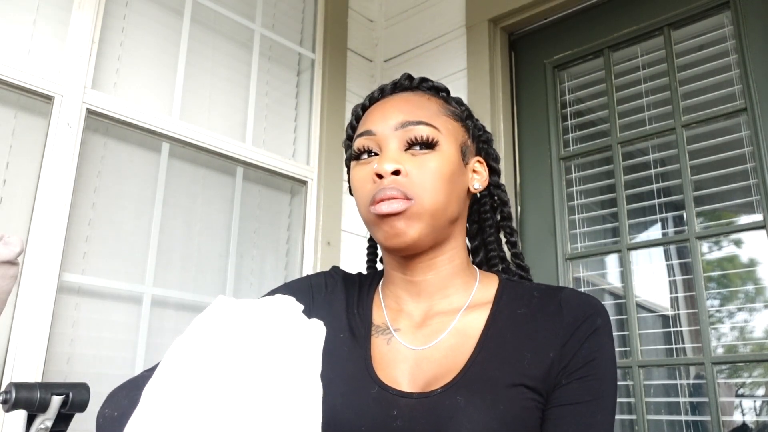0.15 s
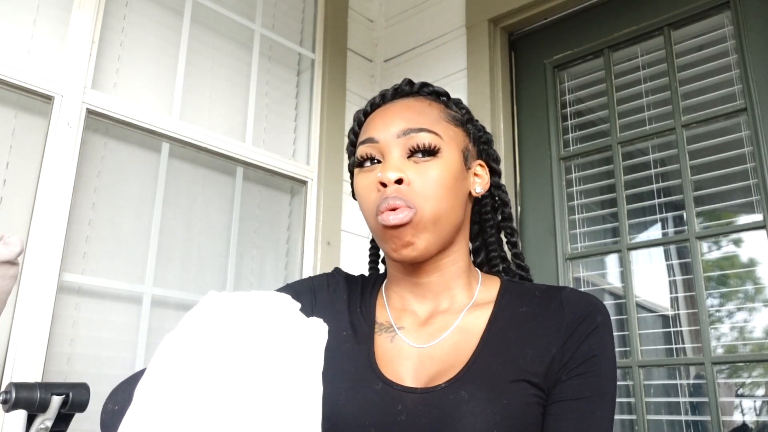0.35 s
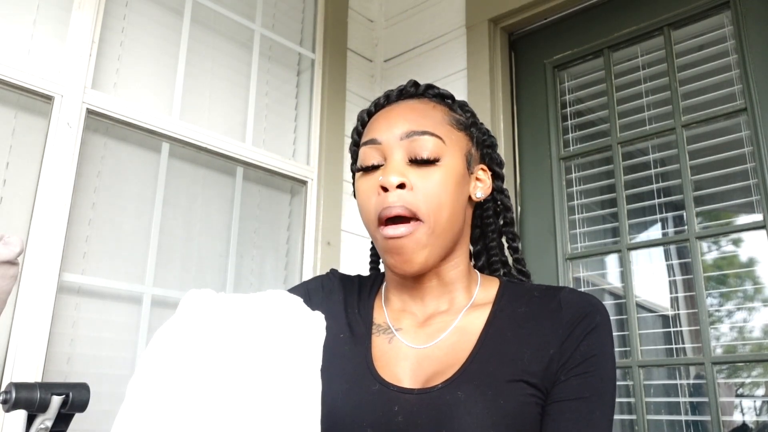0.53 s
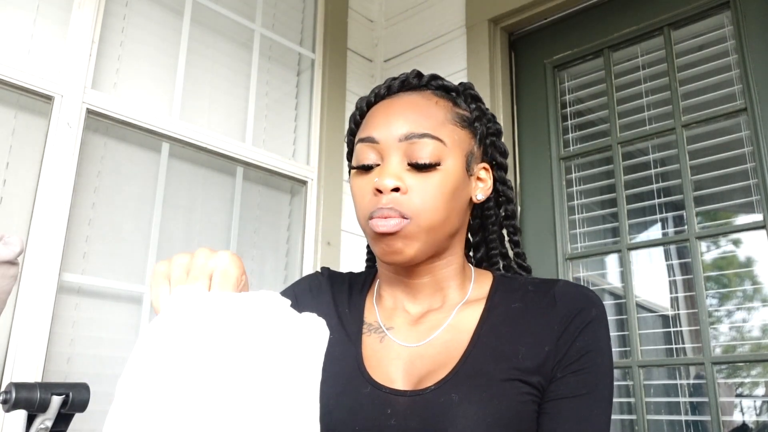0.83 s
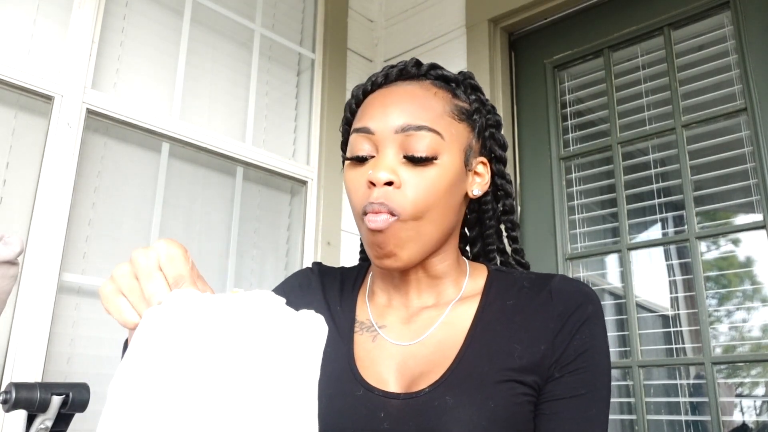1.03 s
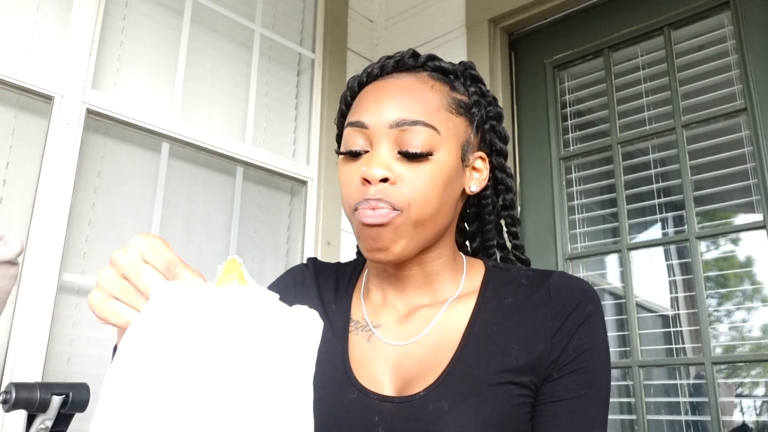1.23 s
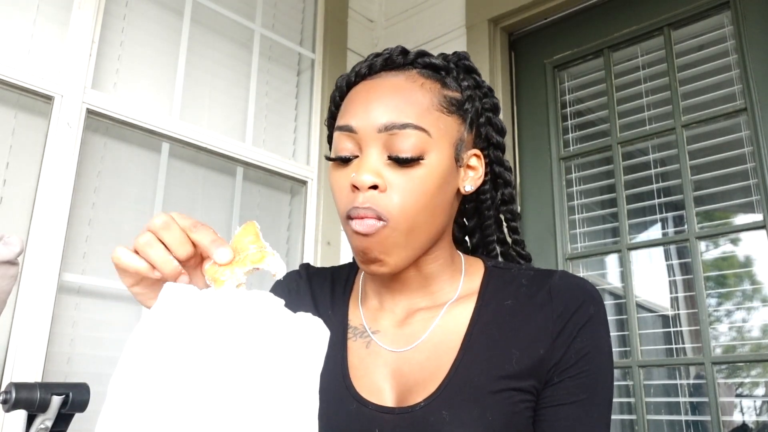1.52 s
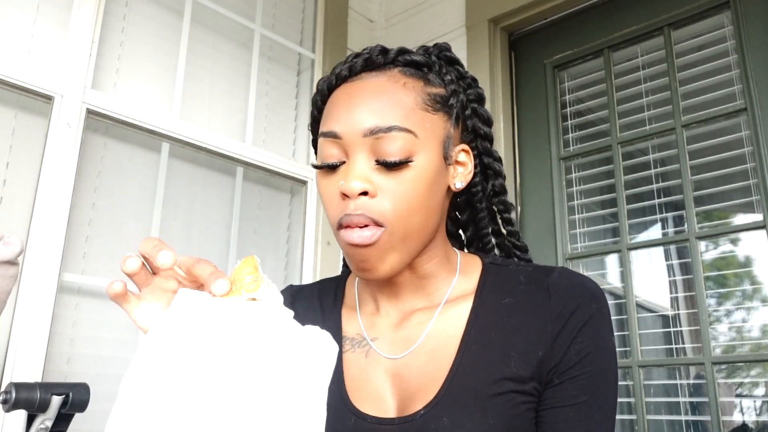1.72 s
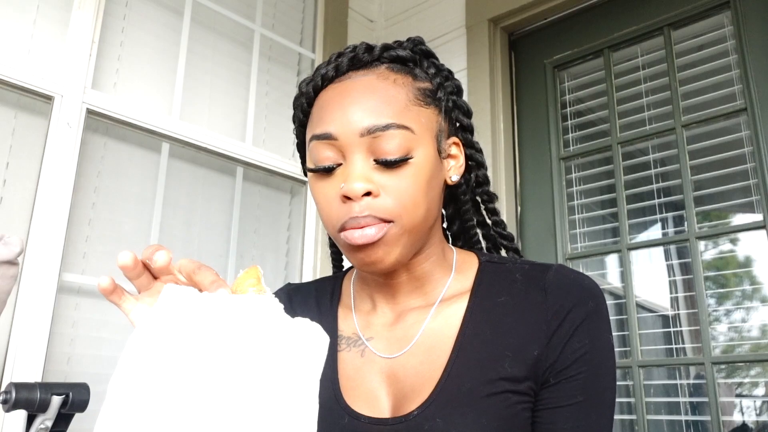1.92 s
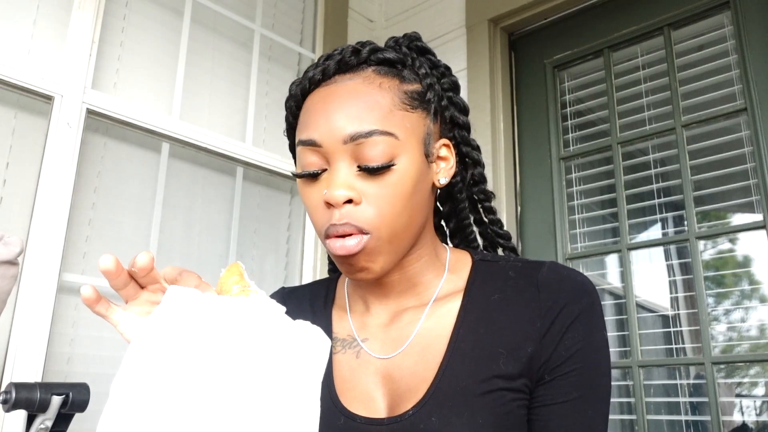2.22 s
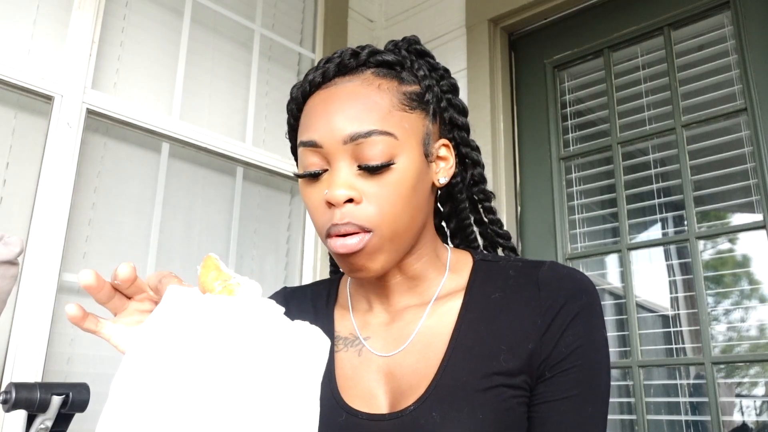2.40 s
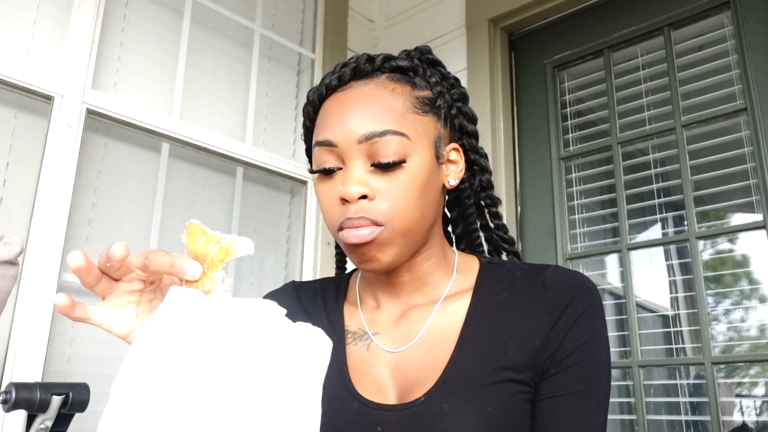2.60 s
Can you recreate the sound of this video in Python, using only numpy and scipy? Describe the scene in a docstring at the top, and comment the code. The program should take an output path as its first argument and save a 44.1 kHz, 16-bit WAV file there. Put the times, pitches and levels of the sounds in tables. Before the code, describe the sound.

A paper bag rustles as a hand digs inside, with crinkles and tiny squeaks. It then quietens to light brushes and scattered sharp crackles, heard close up on a covered porch with a faint outdoor hush.

```python
"""Paper rustles, squeaks and snaps as a hand rummages in a paper bag, close up on a covered porch.
Sliding fibres catch and let go in a grainy rustle, and chirp where they stick and slip.
Creases buckle with a crack that rings the bag; small folds tick, wrinkles crinkle, light touches brush.
The porch walls answer with a short bright tail over a faint outdoor wash."""
import sys
import numpy as np
from scipy import signal
from scipy.fft import rfft, irfft
from scipy.io import wavfile
from scipy.ndimage import uniform_filter1d

SR = 44100
rng = np.random.default_rng(int(sys.argv[2]) if len(sys.argv) > 2 else 0)


def store_pcm(level_fs):
    """Save levels as 16-bit WAV."""
    pcm = np.round(np.clip(level_fs, -1, 1) * 32767).astype(np.int16)
    wavfile.write(sys.argv[1], SR, np.atleast_2d(pcm).T)


N = 121275
TIME = np.arange(N) / SR

# Creases that snap: start_s, level_1k_db, level_2k_db, level_4k_db, level_8k_db, level_14k_db,
# ring_ms, crack_strength, porch_send_db
CREASE_SNAPS = [(.072, -46, -37, -56, -63, -70, 0.68, .3, -1),
                (0.1993, -34.5, -32, -33, -47.5, -81, 0.96, 0.57, -2.5),
                (0.2155, -43.5, -38, -47, -62, -74, 0.65, .4, 3),
                (0.4124, -40.5, -31, -35.5, -42.5, -48, 0.67, .5, -24),
                (0.4328, -45, -44, -34, -68, -66, 0.48, 0.33, -2),
                (.4905, -40, -40, -59, -66, -55, 1.1, .1, -3),
                (0.5191, -43, -34, -29.5, -84, -56, 0.39, 0.37, -3),
                (.548, -38.5, -35, -38.5, -64, -56, 1.3, .1, -21),
                (0.7258, -38, -34, -32, -35, -50.5, 1.16, 1.15, 0),
                (0.9757, -39, -47, -52.5, -80, -87, 0.85, .5, -4),
                (0.9915, -34.5, -47, -60, -83, -81, 0.8, 0.49, -1),
                (1.2612, -46, -66, -48, -60, -69, 0.79, 0.44, 1),
                (1.349, -41, -44.5, -53, -62, -88, 0.82, 0.16, -8),
                (1.351, -52, -44.5, -39, -48, -76, 0.76, 0.38, -4),
                (1.677, -50, -41, -56, -85, -96, 1.1, .2, -1),
                (1.6908, -40, -46, -58, -82, -82, .5, 0.72, -6),
                (1.6955, -27.5, -26, -25, -37.5, -48, 0.88, 0.79, -0.5),
                (1.7198, -43.5, -40, -48, -61, -66, 0.55, .7, -16),
                (1.8655, -42.5, -37.5, -59, -58, -60, 0.83, 0.73, -4),
                (1.9572, -45.5, -42, -56, -74, -69, 0.47, 0.34, 3),
                (1.995, -42, -37, -38.5, -52, -63.5, 0.63, 0.54, 3.5),
                (2.2531, -31.5, -35.5, -41.5, -54, -77, 1.5, 0.66, -1.5),
                (2.2631, -51, -63, -38.5, -37.5, -59, 0.57, 0.18, -2),
                (2.2766, -28, -31.5, -33, -39.5, -59, 0.91, 0.1, -1),
                (2.3603, -71, -43, -54, -52, -64, 0.41, 0.34, 11),
                (2.3705, -27, -21, -20, -23.5, -34, 1.22, .06, -3),
                (2.481, -62, -58, -50, -74, -84, 1.1, .3, -1)]
# The five tone bands of a snap: freq_hz
SNAP_BANDS_HZ = [1000, 2000, 4000, 8000, 14000]
# Bass roll-off of a snap, relative to its lowest band: freq_hz, gain_db
SNAP_BASS_EQ = [(40, -56), (200, -39.5), (400, -14.5), (560, -15.5), (760, -3)]
# Resonances and hollows of the bag: centre_hz, width_hz, gain_db
BAG_RESONANCES = [(796, 140, 4.5), (1142, 160, 5.5), (1310, 56, 3), (1555, 140, -2.5), (2420, 500, 7),
                  (3070, 140, 2), (4400, 990, 10), (8100, 2300, 23)]
# How hard the hand slides on the paper: time_s, level_db
HAND_SLIDE = [(0, -46.5), (.04, -45.5), (.12, -44.5), (.147, -51.5), (.19, -40.5), (.225, -42),
              (.262, -57.5), (.305, -50.5), (.37, -46), (.44, -42.5), (.54, -42.5), (.635, -43), (.70, -52),
              (.79, -50.5), (.88, -60.5), (1.04, -60.5), (1.11, -53), (1.19, -64), (1.27, -55), (1.36, -62),
              (1.7, -68), (1.87, -55), (1.97, -64.5), (2.75, -62.5)]
# Tone of sliding paper: freq_hz, gain_db
RUSTLE_EQ = [(40, -51), (250, -26), (500, -8), (900, -1), (1500, 0.5), (3000, 0.5), (5000, -1.5),
             (7000, -7), (10000, -12), (16000, -23)]
# Stick-slip chirps: start_s, length_s, start_pitch_hz, end_pitch_hz, level_db
SLIP_SQUEAKS = [(0.023, 0.047, 4650, 4400, -49.5), (0.307, 0.0188, 2517, 2480, -42),
                (.328, 0.038, 2585, 2490, -59), (.384, .007, 2260, 2600, -37),
                (0.3925, 0.0034, 3120, 3250, -34), (0.397, .005, 3080, 3300, -32.5),
                (.453, 0.00354, 3310, 3180, -27)]
# Small folds that tick: start_s, level_db
FOLD_TICKS = [(1.249, -54.5), (1.7883, -49), (1.7935, -51.5), (1.81, -60), (1.8293, -48.5), (1.8465, -50),
              (1.8575, -47), (1.8711, -44), (1.8944, -47.5), (1.9443, -50.5), (2.2455, -56), (2.466, -53.5)]
# Thin, bright tone of a tick: freq_hz, gain_db
TICK_EQ = [(100, -38), (1000, -22), (3000, -3), (4800, 7.5), (8500, 1), (12000, -1), (16000, -13)]
# Light touches on the bag: peak_s, half_length_s, level_db
BRUSH_SWELLS = [(1.11, 0.026, -55.5), (1.644, 0.06, -59.5), (1.898, .09, -62.5), (2.231, .025, -55),
                (2.556, 0.065, -51), (2.727, 0.0073, -52.5)]
# Dull tone of a touch: freq_hz, gain_db
BRUSH_EQ = [(40, -68), (150, -32), (400, -11), (850, 3), (1900, 3), (3500, -17), (15000, -30)]
# Tone of the porch reverb: freq_hz, gain_db
PORCH_EQ = [(100, 10), (1000, -5), (2500, -0.5), (5000, -1), (9000, 0.5), (16000, 1.5)]
# Tone of the distant outdoor wash: freq_hz, gain_db
OUTDOOR_EQ = [(15, -71), (25, -48.5), (223, -17), (405, -15.5), (591, -3), (734, -2.5), (936, 1.5),
              (1260, -1), (1940, -5.5), (2840, -10.5), (3080, -9.5), (3340, -23), (4610, -23),
              (5140, -32.5), (16000, -32.5)]

BURST_SAMPLES, LEVEL_WINDOW_S = 2048, .005  # snap and tick levels are energy averaged over this window
SNAP_TRIM_DB, SNAP_SIDE_DB, WALL_COUNT = -0.5, -26, 4
CRACK_GAIN, FLUTTER_GRAIN_DB, LOW_RING_STRETCH, LOW_RING_HZ = 3, 3, 1.55, 1370
GRAINS_PER_S, GRAIN_SPREAD_DB, RUSTLE_FLICKER_DB, RUSTLE_TRIM_DB = 9000, 2.5, 0.83, -0.5
CRINKLES_PER_S, CRINKLE_TRIM_DB, CRINKLE_SPREAD_DB = 200, -1, 2
CRINKLE_HZ, CRINKLE_SPREAD_OCTAVES, CRINKLE_RING_MS = 4570, 1.32, 0.24
SQUEAK_PITCH_JITTER, SQUEAK_ROUGH_DB, SQUEAK_OVERTONE_DB = 0.045, -2.5, -16
TICK_SCATTER_DB = 6.5
TICK_SEND_DB, SLIDE_SEND_DB, SQUEAK_SEND_DB = 0.5, -5, -4
PORCH_DB, PORCH_T60_S, PORCH_BUILD_S = -4.5, 0.23, .009
OUTDOOR_DB, OUTDOOR_WAVER_DB = -54.5, 0.14
TOP_HZ = 15850


def crease_snaps():
    """Large creases snap, each with its own tone; the sheet radiates differently towards each wall."""
    mid, side = np.zeros((2, N))
    wall_sends = np.zeros((WALL_COUNT, N))
    band_offset_db = 10 * np.log10(LEVEL_WINDOW_S * SR ** 2 / (np.sqrt(2) * np.array(SNAP_BANDS_HZ)))
    for start, *levels_db, ring_ms, crack, send_db in CREASE_SNAPS:
        band_db = np.array(levels_db) + band_offset_db + SNAP_TRIM_DB
        bass = [(hz, band_db[0] + db) for hz, db in SNAP_BASS_EQ]
        eq = bass + list(zip(SNAP_BANDS_HZ, band_db))
        add(mid, start, buckle(eq, ring_ms, crack))
        add(side, start, buckle(eq, ring_ms, crack))
        for send in wall_sends:
            add(send, start, buckle(eq, ring_ms, crack) * undb(send_db))
    reverb = sum(porch(send, side_db=-15) for send in wall_sends) / np.sqrt(WALL_COUNT)
    return stereo(mid, side, SNAP_SIDE_DB) + reverb


def buckle(eq, ring_ms, crack):
    """A fold flips: a sharp crack, then a flutter that lasts longer in the lows and rings the bag."""
    age = np.arange(BURST_SAMPLES) / SR * 1000 / ring_ms
    grit = rng.standard_normal(BURST_SAMPLES)
    grit *= undb(FLUTTER_GRAIN_DB * rng.standard_normal(BURST_SAMPLES))
    lows = cut(rng.standard_normal(BURST_SAMPLES), "lowpass", hz=LOW_RING_HZ)
    low_age = age / LOW_RING_STRETCH
    burst = grit * age * np.exp(-age) + lows * low_age * np.exp(-low_age)
    burst[0] += CRACK_GAIN * crack
    spectrum, hz = rfft(burst), np.fft.rfftfreq(BURST_SAMPLES, 1 / SR)
    body = undb(sum(db / (1 + (2 * (hz - centre) / width) ** 2) for centre, width, db in BAG_RESONANCES))
    # The EQ replaces the broad contour; the bag's narrow peaks survive.
    contour = np.sqrt(uniform_filter1d(abs(spectrum * body) ** 2, size=37))
    return irfft(spectrum * minimum_phase(eq_gains(eq, BURST_SAMPLES) * body / contour))


def rustle():
    """Paper fibres catch and let go in dense uneven grains while the hand slides."""
    grains = (rng.random(N) < GRAINS_PER_S / SR) * rng.choice([-1, 1], N)
    accents = undb(GRAIN_SPREAD_DB * np.minimum(rng.exponential(size=N), 6))
    level_db = slide_db(TIME) + RUSTLE_TRIM_DB + RUSTLE_FLICKER_DB * wander(rate_hz=48)
    return colour(grains * accents, RUSTLE_EQ) * undb(level_db)


def crinkles():
    """Tiny wrinkles flick at random as the hand slides, each at its own pitch; high ones are weaker."""
    track, t = np.zeros(N), TIME[:BURST_SAMPLES]
    age = t * 1000 / CRINKLE_RING_MS
    envelope = age * np.exp(1 - age)
    for when, pitch, chance in rng.random((int(CRINKLES_PER_S * N / SR), 3)):
        start = when * N / SR
        hz = min(CRINKLE_HZ * 2 ** (CRINKLE_SPREAD_OCTAVES * (2 * pitch - 1)), TOP_HZ)
        accent_db = CRINKLE_SPREAD_DB * min(-np.log(chance), 3)
        gain = undb(slide_db(start) + CRINKLE_TRIM_DB + accent_db) * min(1, CRINKLE_HZ / hz)
        add(track, start, gain * envelope * np.sin(2 * np.pi * hz * t))
    return cut(track, "highpass", hz=700)


def squeaks():
    """Where the paper grips, it slips at a fast unsteady rate and chirps."""
    track, jitter, roughness = np.zeros(N), wander(rate_hz=430), wander(rate_hz=330)
    for start, length, from_hz, to_hz, db in SLIP_SQUEAKS:
        first, size = int(start * SR), int(length * SR)
        span = slice(first, first + size)
        pitch_hz = np.linspace(from_hz, to_hz, size) * (1 + SQUEAK_PITCH_JITTER * jitter[span])
        phase = 2 * np.pi * np.cumsum(pitch_hz) / SR
        tone = np.sin(phase) + undb(SQUEAK_OVERTONE_DB) * (np.sin(2 * phase) + np.sin(3 * phase) / 2)
        envelope = signal.windows.tukey(size, alpha=.15) * undb(SQUEAK_ROUGH_DB * roughness[span])
        add(track, start, undb(db) * unit_rms(tone * envelope))
    return cut(track, "highpass", hz=900)


def fold_ticks():
    """Small folds buckle in thin bright ticks, no two with the same tone."""
    track = np.zeros(N)
    for start, level_db in FOLD_TICKS:
        eq = [(hz, db + TICK_SCATTER_DB * rng.standard_normal()) for hz, db in TICK_EQ]
        tick = buckle(eq, ring_ms=0.5, crack=0.66)
        add(track, start, tick * undb(level_db) * np.sqrt(LEVEL_WINDOW_S * SR / np.sum(tick ** 2)))
    return track


def brushes():
    """Light touches on the bag give soft, dull swells of friction."""
    swell = sum(undb(db) * np.exp(-((TIME - peak) / half) ** 2) for peak, half, db in BRUSH_SWELLS)
    return swell * colour(rng.laplace(size=N), BRUSH_EQ)


def porch(send, side_db):
    """Weak early scatter builds until the near walls answer, then dies in a short tail."""
    t = TIME[:SR // 2]
    envelope = np.minimum(t / PORCH_BUILD_S, 1) * np.exp(-np.log(1000) * t / PORCH_T60_S)
    tails = [colour(rng.standard_normal(len(t)), PORCH_EQ) * envelope for _ in range(2)]
    mid, side = (signal.fftconvolve(send, tail / np.sqrt(np.sum(tail ** 2)))[:N] for tail in tails)
    return undb(PORCH_DB) * stereo(mid, side, side_db)


def outdoors():
    """A faint, slightly wavering bed of distant noise."""
    mid, side = (colour(rng.standard_normal(N), OUTDOOR_EQ) for _ in range(2))
    return stereo(mid, side, side_db=-7) * undb(OUTDOOR_DB + OUTDOOR_WAVER_DB * wander(rate_hz=2.7))


def slide_db(time_s):
    """Level of the sliding hand at a given time."""
    return np.interp(time_s, *np.array(HAND_SLIDE).T)


def undb(db):
    return 10 ** (np.asarray(db) / 20)


def unit_rms(x):
    return x / np.sqrt(np.mean(x ** 2))


def eq_gains(eq, size):
    """Gain at each frequency bin from (freq_hz, gain_db) points."""
    hz, db = np.array(eq).T
    return undb(np.interp(np.log(np.fft.rfftfreq(size, 1 / SR) + 1), np.log(hz), db))


def colour(x, eq):
    """Apply an EQ curve and normalise to rms 1."""
    return unit_rms(irfft(rfft(x) * eq_gains(eq, len(x)), len(x)))


def minimum_phase(gains):
    """A filter with these gains that rings after the hit, keeping the attack sharp."""
    cepstrum = irfft(np.log(gains))
    half = len(cepstrum) // 2
    cepstrum[1:half] *= 2
    cepstrum[half + 1:] = 0
    return np.exp(rfft(cepstrum))


def cut(x, kind, hz):
    """A gentle filter, 12 dB per octave."""
    return signal.sosfilt(signal.butter(2, hz, kind, fs=SR, output="sos"), x)


def wander(rate_hz):
    """Smooth random modulation at rms 1."""
    return colour(rng.standard_normal(N), [(rate_hz, 0), (rate_hz * 10, -60)])


def add(track, start_s, x):
    """Mix a short sound into a track."""
    first = int(start_s * SR)
    track[first:first + len(x)] += x[:N - first]


def stereo(mid, side, side_db):
    """Left and right from mid and side."""
    return mid + undb(side_db) * side * np.array([[1], [-1]])


def scene():
    """The bag in the centre, with the porch and the outdoors around it."""
    wash, snap, tick, brush, squeak = outdoors(), crease_snaps(), fold_ticks(), brushes(), squeaks()
    slide = rustle() + crinkles()
    send = tick * undb(TICK_SEND_DB) + slide * undb(SLIDE_SEND_DB) + squeak * undb(SQUEAK_SEND_DB) + brush
    return snap + tick + slide + squeak + brush + porch(send, side_db=-41) + wash


def record(dry):
    """A steep low-pass shaves the very top off the mix."""
    return signal.sosfilt(signal.ellip(10, .2, 70, TOP_HZ, fs=SR, output="sos"), dry)


dry = scene()
out = record(dry)
store_pcm(out)
```